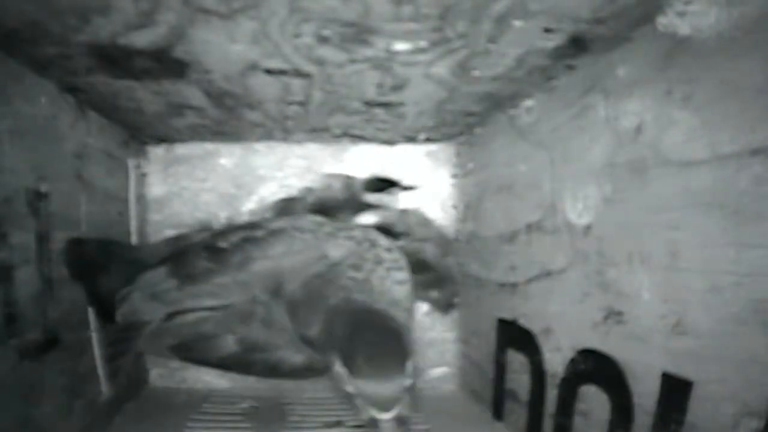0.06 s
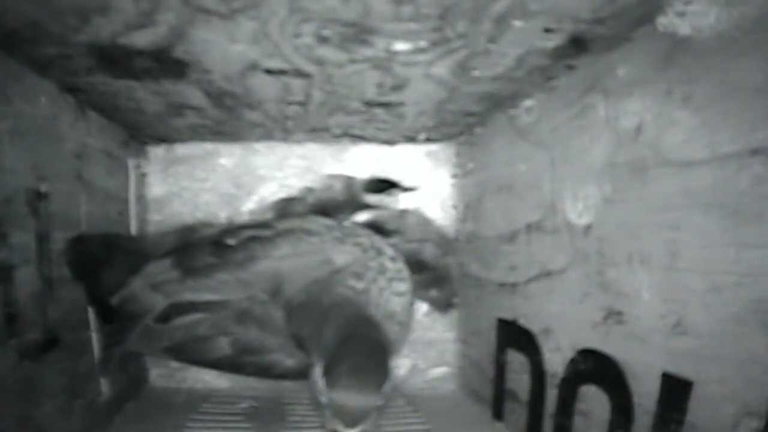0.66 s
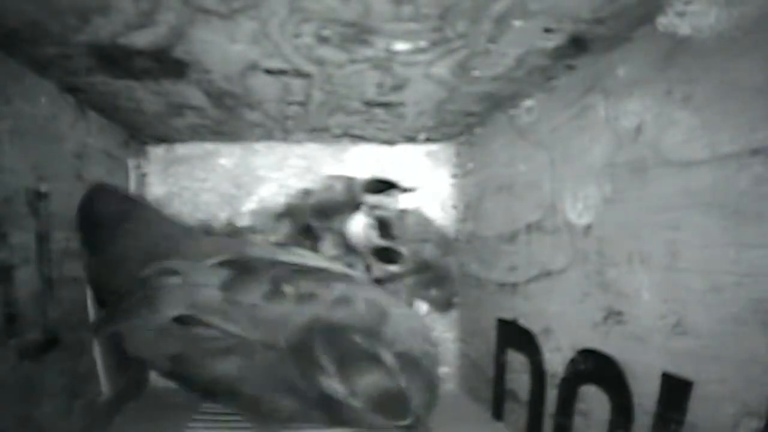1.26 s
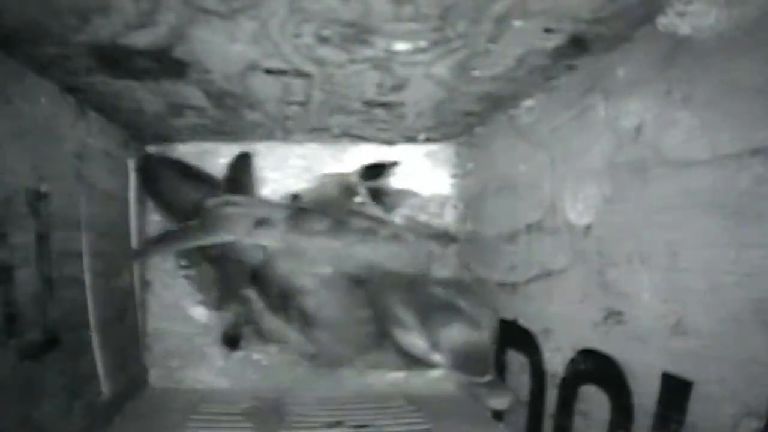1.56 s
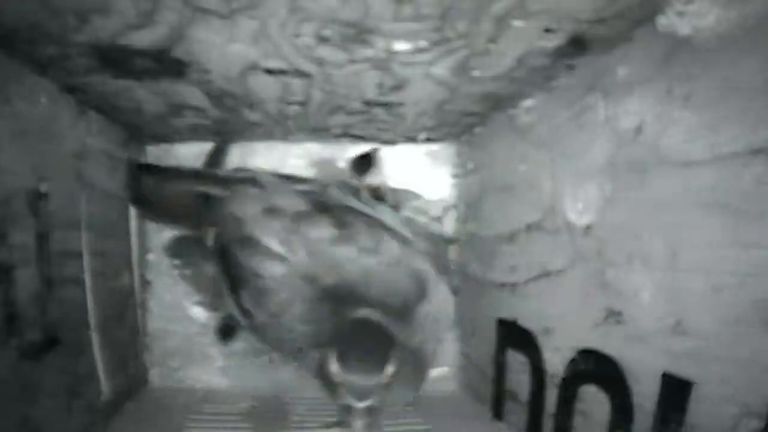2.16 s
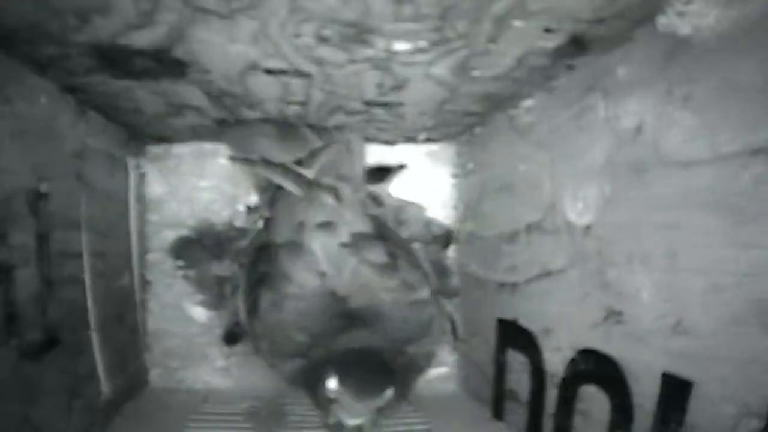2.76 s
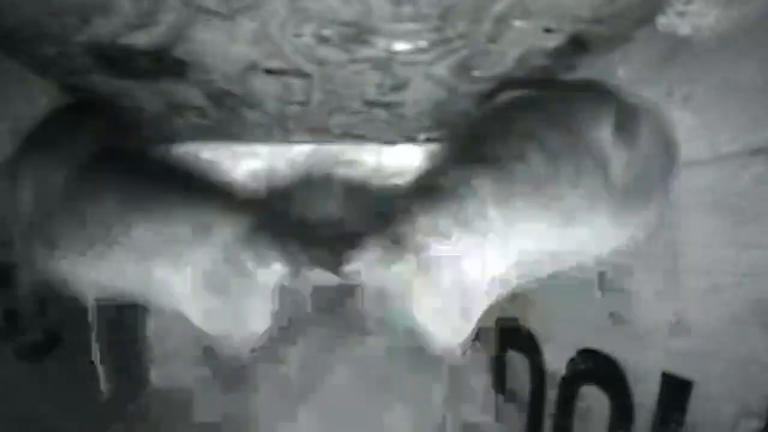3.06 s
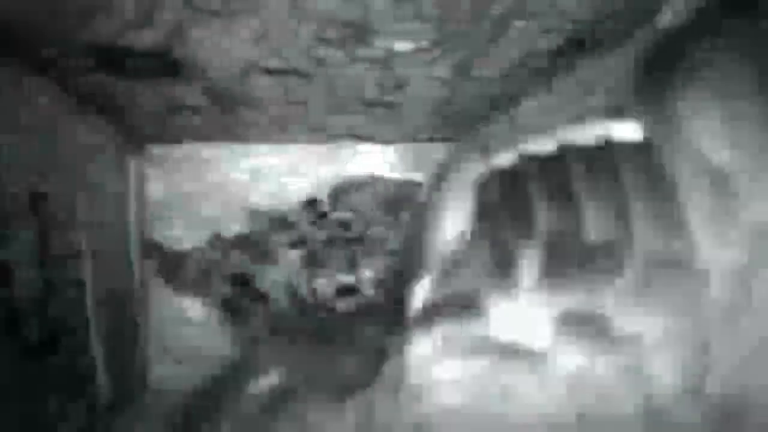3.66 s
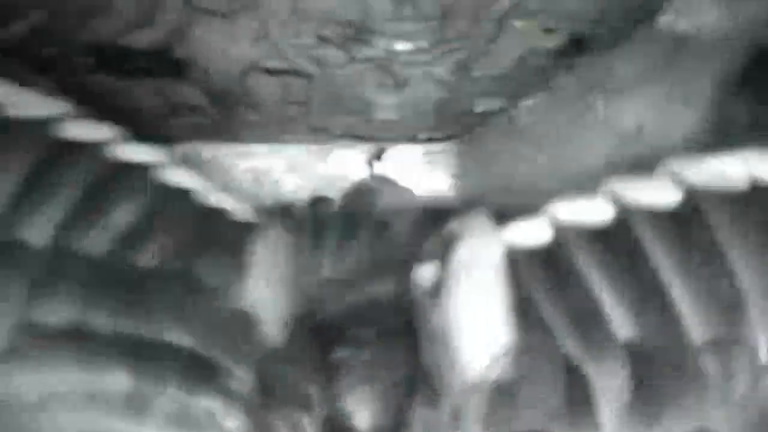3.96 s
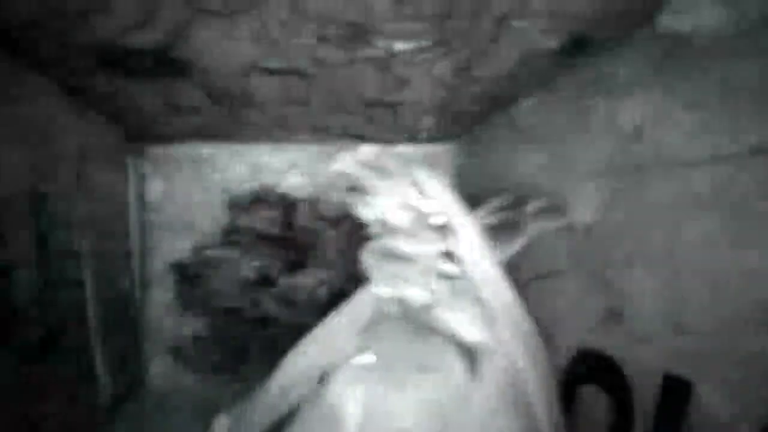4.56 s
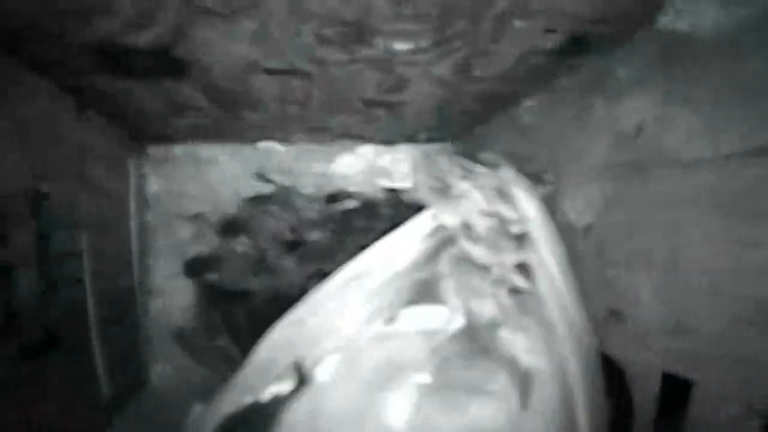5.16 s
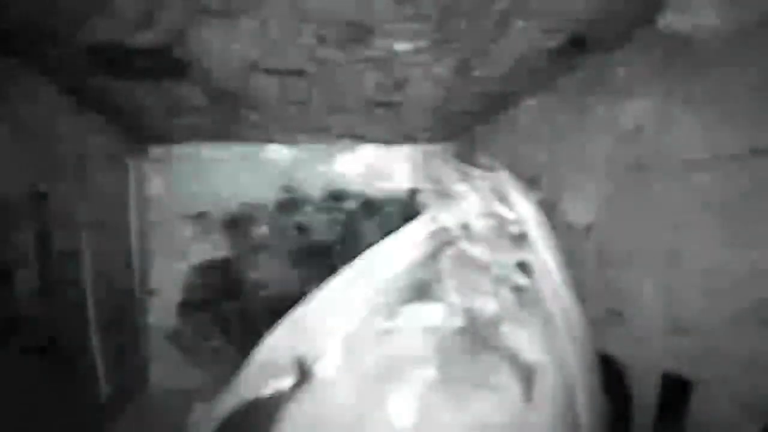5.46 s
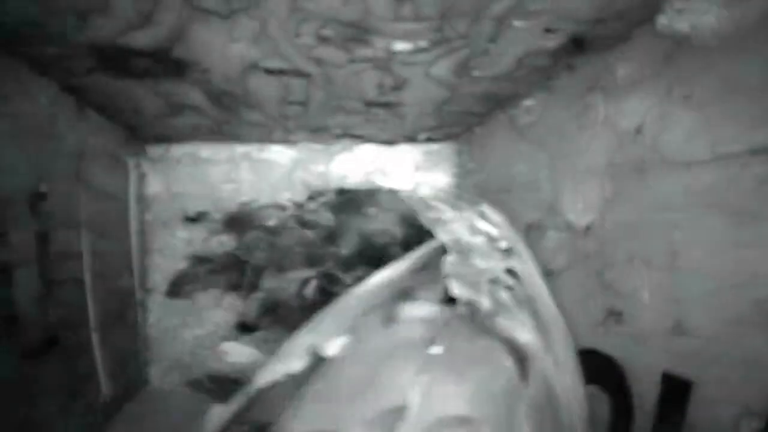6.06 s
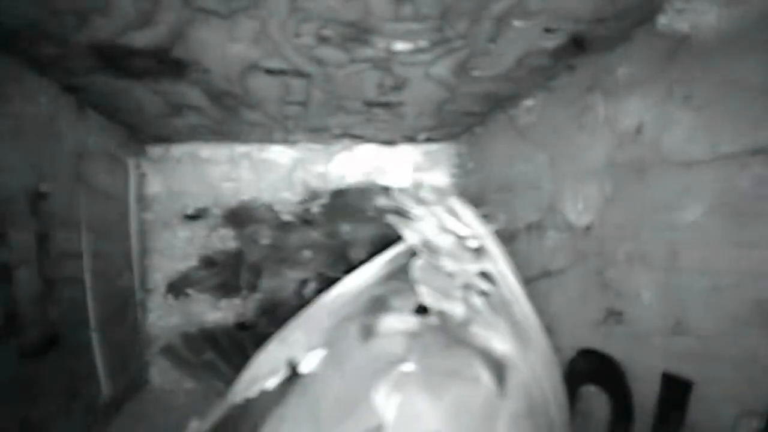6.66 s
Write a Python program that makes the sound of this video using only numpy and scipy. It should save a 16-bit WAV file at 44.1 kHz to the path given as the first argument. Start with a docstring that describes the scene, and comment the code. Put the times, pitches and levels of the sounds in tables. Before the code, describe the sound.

A steady low electrical buzz and faint hiss run throughout, heard from a close microphone inside a wooden nest box, on the left side only. A duckling gives two very faint falling peeps just before 1 second. From about 1 to 1.5 seconds a duck shifts, making three hollow knocks on the boards and a brush of feathers. Light claw taps, small scrapes and rustles follow until 3 seconds. Then the duck scrambles up the wall: feet and wings thump the wood, claws scratch, feathers rustle hard and wingbeats buffet the microphone with low puffs. The heaviest blows, near 3.3, 3.8 and 4.3 seconds, overload slightly. The flurry eases after 4.5 seconds, with one more sharp tap and scrape at 5 seconds. The duck settles with soft rustling, a couple of light knocks near 5.7 seconds and scattered ticks until almost 7 seconds.

```python
"""A duck shifts about in a wooden nest box, then scrambles up the wall with beating wings and settles.
Feet and wings thump the boards, claws scrape and tap the wood, feathers rustle in bursts and
wingbeats puff air at the microphone. A duckling peeps faintly twice before the scramble.
A small camera microphone inside the box buzzes at the field rate, overloads on the big blows
and feeds the left channel only."""
import sys
import numpy as np
from scipy import signal
from scipy.fft import rfft, irfft
from scipy.io import wavfile

SR = 44100
rng = np.random.default_rng(int(sys.argv[2]) if len(sys.argv) > 2 else 0)


def to_wav(sig):
    """Store sig (one row per channel, or 1-D mono) as 16-bit WAV at the path in sys.argv[1].

    Samples outside -1..1 are clipped; the rate is SR.
    """
    pcm = np.clip(np.atleast_2d(sig), -1, 1) * 32767
    pcm = np.round(pcm).astype(np.int16)
    wavfile.write(sys.argv[1], SR, pcm.T)  # frames by channels


N = 299659
TIME = np.arange(N) / SR

# resonances of the box and the microphone housing: centre_hz, width_hz, lift_db
BOX_RESONANCES = [(92.7, 3.4, 6), (111.6, 25, 10), (204.6, 7.2, 8), (300, 56, 8), (355.8, 31, 8.5),
                  (436.8, 19, 6.5), (620, 66, 10.5), (694, 61, 3.5), (897, 40, 3.5), (1207, 61, 5),
                  (1432, 67, 1), (1630, 130, 1), (1890, 44, 4), (2068, 24, -30), (2565, 164, 5),
                  (2810, 100, 6.5), (3280, 32, 3.5), (3530, 70, -2), (4374, 78, 5.5), (4604, 290, 11),
                  (6650, 420, 11), (8370, 370, 10), (10100, 690, 10)]
# EQ curves for the midrange rub, bright edge and low board shake of a contact: freq_hz, gain_db
RUB_EQ = [(100, 1), (350, -4), (750, 3), (1100, 8.5), (2000, 7), (2700, -4), (3500, -4), (6000, -53.5),
          (15000, -70)]
HISS_EQ = [(800, -41), (2400, 4), (3500, 4), (5000, -3), (7000, -9.5), (9500, -17), (12000, -16.5),
           (13000, -99), (16000, -82)]
SHAKE_EQ = [(50, -20), (150, -15.5), (300, 0.5), (450, -4), (700, -4), (1300, -33), (4000, -78.5)]
# how hard the duck struggles: time_s, level_db
EFFORT = [(1.2, -90), (1.34, -45), (1.5, -48.5), (1.74, -61), (2.63, -52.5), (2.79, -62), (3.07, -58),
          (3.21, -37.5), (3.3, -27), (3.99, -40.5), (4.21, -33.5), (4.34, -35.5), (4.67, -45), (5.11, -48),
          (5.54, -55), (6.28, -48.5), (6.46, -55), (6.79, -58.5)]


def from_db(db):
    """Decibels to gain."""
    return 10 ** (np.asarray(db) / 20)


def rms_one(x):
    """Scale to an rms of 1."""
    return x / np.sqrt(np.mean(x ** 2) + 1e-20)


def drift(rate_hz):
    """A random wander with an rms of 1."""
    knots = rng.standard_normal(4096)
    return rms_one(np.interp(TIME * rate_hz, np.arange(len(knots)), knots))


def colour(x, curve, peaks=(), size=8192):
    """Minimum-phase EQ of unit power gain: a smooth curve with resonances on it."""
    hz = np.maximum(np.arange(size // 2 + 1) * SR / size, 1)
    curve_hz, curve_db = np.transpose(curve)
    db = np.interp(np.log(hz), np.log(curve_hz), curve_db)
    for centre_hz, width_hz, lift_db in peaks:
        db += lift_db / (1 + (2 * (hz - centre_hz) / width_hz) ** 2)
    cepstrum = irfft(np.log(from_db(db)))
    cepstrum[1:size // 2] *= 2   # folded so that nothing rings ahead of a hit
    cepstrum[size // 2 + 1:] = 0
    response = irfft(np.exp(rfft(cepstrum)))
    return signal.fftconvolve(x, response / np.linalg.norm(response))[:N]


def stroke(start_s, hold_s, rise_s, t60_s, max_s=0.25):
    """Envelope of one gesture: it rises, holds until hold_s after its start and dies away."""
    out, first = np.zeros(N), int(start_s * SR)
    age = TIME[:min(N - first, int(max_s * SR))]
    decay = from_db(-60 * np.maximum(age - hold_s, 0) / t60_s)
    out[first:first + len(age)] = np.minimum(age / rise_s, 1) * decay
    return out


def ring(start_s, hz, t60_s):
    """One struck mode of the wood: a decaying sine."""
    out, first = np.zeros(N), int(start_s * SR)
    age = TIME[:min(N - first, SR // 2)]
    swell = 1 - np.exp(-age * hz * np.pi)   # the board takes part of a cycle to get going
    out[first:first + len(age)] = swell * np.sin(2 * np.pi * hz * age) * from_db(-60 * age / t60_s)
    return out


def friction(slips_per_s, spread_db, smooth_db, judder_db, judder_hz):
    """Tiny slips of uneven size over a smooth slide, bunched as the contact catches and lets go."""
    sizes = from_db(spread_db * np.minimum(rng.exponential(1, N), 4)) * rng.choice([-1, 1], N)
    slips = rms_one(sizes * (rng.random(N) < slips_per_s / SR))
    slide = from_db(smooth_db) * rng.standard_normal(N)
    return rms_one((slips + slide) * from_db(judder_db * drift(judder_hz)))


def wall_echoes(x, spread_s, echo_db, count=10):
    """Each spot in the box has its own close reflections, which comb the sound differently."""
    path = np.zeros(SR // 40)
    where, strengths = rng.random(count), rng.standard_normal(count)
    delays = np.clip((where * spread_s * SR).astype(int), 8, len(path) - 1)
    path[delays] = from_db(echo_db) * strengths / np.linalg.norm(strengths)
    path[0] = 1
    return signal.fftconvolve(x, path)[:len(x)]


def effort(easy_shuffle_db=-50.5):
    """The duck's effort at every moment, in dB over an easy shuffle; before it stirs it sits still."""
    return np.interp(TIME, *np.transpose(EFFORT), left=-120) - easy_shuffle_db


def dulling(level_db, medium_contact_db=-29.5):
    """Treble loss in dB: a claw that digs in harder sounds duller."""
    return 0.1045 * (level_db - medium_contact_db)


def noise_floor():
    """A steady, bass-heavy bed of noise."""
    # tone of the bed: freq_hz, gain_db
    floor_eq = [(20, 8), (60, 4), (130, 3), (300, -3.5), (600, -11.5), (1000, -13.5), (2000, -16.5),
                (3200, -24), (7000, -26.5), (15000, -31)]
    return from_db(-48) * colour(rng.standard_normal(N), floor_eq)


def camera_buzz(field_hz=59.94, first_field_s=0.0016, pulse_s=0.00043, fizz_s=0.001):
    """Each picture field leaks a dull pulse and a puff of hiss; the line scan adds a blurred whine."""
    phase = (TIME - first_field_s) * field_hz
    gap_s = np.abs((phase + 0.5) % 1 - 0.5) / field_hz   # to the nearest pulse
    pulses = -np.exp(-gap_s / pulse_s)
    pulses -= pulses.mean()
    ripple = -np.cos(4 * np.pi * phase)
    hiss = colour(rng.standard_normal(N), [(200, 0), (2000, -3), (5000, -10), (15000, -16)])
    fizz = np.exp(-gap_s / fizz_s) * hiss
    whine_band = signal.butter(2, [15320, 15480], "band", fs=SR, output="sos")
    whine = rms_one(signal.sosfilt(whine_band, rng.standard_normal(N)))
    return from_db(-35) * pulses + from_db(-56) * ripple + from_db(-55) * fizz + from_db(-65) * whine


def knocks():
    """Each blow cracks, sets the struck board ringing and leaves the box humming low."""
    # feet and wing bones hit the boards: start_s, level_db, pitch_hz, crack_offset_db
    blows = [(.049, -39.5, 300, -12), (1.075, -15, 324, -6.5), (1.32, -10.5, 335, -3),
             (1.5318, -1.5, 453, -8), (2.054, -26, 334, -12), (2.466, -29, 347, -7), (3.158, -5.5, 300, -5),
             (3.193, -8.5, 300, -28), (3.328, 14.5, 304.2, -10.5), (3.49, 3.5, 208, -3.5),
             (3.774, 13, 303.6, -15), (3.807, 0, 257.5, -15.5), (3.941, -10.5, 337, -0.5),
             (4.238, 5, 220, -19.5), (4.243, 1, 104, -21), (4.25, 1, 400.5, -17), (4.258, 5, 247.4, -16.5),
             (4.28, 3, 308.3, -3), (4.387, -17, 263, 1), (4.485, -10.5, 335, -9.5),
             (4.57, -12.5, 344.5, -8.5), (5.058, -20, 333, -27), (5.703, -22, 451, -10.5),
             (5.731, -19, 455, -3.5)]
    # how long the boards ring: pitch_hz, t60_s
    board_decay = [(210, 0.057), (305, 0.12), (340, 0.14), (455, 0.084)]
    # a board's other modes: pitch_ratio, level_db, t60_ratio
    board_modes = [(.68, -9.5, 0.86), (1.499, -12, 0.59), (2.22, -16.5, 0.54)]
    # the whole box after a blow: pitch_hz, level_db, t60_s
    box_modes = [(117, -23.5, 0.27), (202.4, -30, 0.73), (315, -17.5, 0.22)]
    # tone of the attack: freq_hz, gain_db
    crack_eq = [(100, -19.5), (400, -0.5), (900, -10.5), (1600, -7), (2200, -16), (3000, -29), (5000, -38),
                (9000, -58), (15000, -56)]
    body, crack = np.zeros((2, N))
    for start_s, level_db, pitch_hz, crack_offset_db in blows:
        t60_s = np.interp(pitch_hz, *np.transpose(board_decay))
        board = ring(start_s, pitch_hz, t60_s)
        for pitch_ratio, mode_db, t60_ratio in board_modes:
            board += from_db(mode_db) * ring(start_s, pitch_hz * pitch_ratio, t60_s * t60_ratio)
        box = sum(from_db(db) * ring(start_s, hz, decay_s) for hz, db, decay_s in box_modes)
        body += from_db(level_db) * (board + box)
        snap = stroke(start_s, hold_s=0.0025, rise_s=0.00045, t60_s=0.04)
        crack += from_db(level_db + crack_offset_db) * snap
    return body + colour(crack * rng.standard_normal(N), crack_eq, BOX_RESONANCES)


def duckling():
    """Soft sine peeps that slide down."""
    # a duckling's faint calls: start_s, length_s, level_db, start_hz, end_hz
    peeps = [(0.71, .042, -59, 2630, 2360), (.862, .048, -61, 2700, 2360)]
    out = np.zeros(N)
    for start_s, length_s, level_db, start_hz, end_hz in peeps:
        progress = np.clip((TIME - start_s) / length_s, 0, 1)
        pitch_hz = start_hz + (end_hz - start_hz) * progress
        tone = np.sin(2 * np.pi * np.cumsum(pitch_hz) / SR)
        out += from_db(level_db) * np.sin(np.pi * progress) * tone
    return out


def feathers():
    """Plumage brushes the walls: barbs hiss and bedding crackles while the body pushes on the boards."""
    # a wing or the tail sweeps along a wall: middle_s, length_s, level_db
    sweeps = [(1.395, 0.08, -33.5), (1.568, 0.029, -28.5), (2.121, 0.11, -45), (2.33, 0.1, -42),
              (2.624, 0.15, -30.5), (3.068, 0.15, -36.5), (3.178, 0.12, -25.5), (3.473, 0.12, -20),
              (3.704, 0.44, -28), (3.968, 0.16, -27.5), (4.152, .17, -26.5), (4.537, 0.087, -33),
              (5.5, 0.059, -42.5), (6.26, 0.12, -41.5)]
    # how heavily the body leans on the boards: time_s, level_db
    weight = [(1.3, -56), (1.68, -41), (1.91, -49.5), (3.09, -52.5), (3.29, -41), (3.33, -26.5),
              (3.84, -33.5), (3.93, -37), (4.21, -39), (4.4, -25.5), (4.69, -42), (5.21, -43.5),
              (5.43, -47.5), (5.93, -53), (6.13, -46), (6.79, -57)]
    # tone of the boards' rumble: freq_hz, gain_db
    push_eq = [(20, -25), (50, 0), (90, -0.5), (160, -3), (300, -1.5), (480, -6), (750, -24), (1300, -22),
               (4000, -99)]
    sweep = np.zeros(N)
    for middle_s, length_s, level_db in sweeps:
        sweep += from_db(level_db) * np.maximum(1 - (2 * (TIME - middle_s) / length_s) ** 2, 0)
    effort_db = effort()
    push = from_db(6.5 + np.interp(TIME, *np.transpose(weight), left=-120))
    rub = np.hypot(from_db(-45 + 0.91 * effort_db), from_db(-2) * sweep)
    hiss = np.hypot(from_db(-55 + 0.89 * effort_db), from_db(-5) * sweep)
    barbs = friction(slips_per_s=1000, spread_db=-1, smooth_db=0.5, judder_db=3, judder_hz=60)
    bedding = friction(slips_per_s=110, spread_db=2.5, smooth_db=-30, judder_db=1.5, judder_hz=15)
    rumble = friction(slips_per_s=3000, spread_db=-2.5, smooth_db=3, judder_db=3.4, judder_hz=40)
    rustle = rms_one(barbs + 0.6 * bedding)
    return (colour(push * rumble, push_eq, BOX_RESONANCES)
            + colour(rub * rustle, RUB_EQ, BOX_RESONANCES)
            + colour(hiss * rustle, HISS_EQ, BOX_RESONANCES))


def wing_air(rise_s=0.029):
    """Wingbeats and lunges buffet the microphone with low puffs."""
    # pushes of air: peak_s, level_db
    wingbeats = [(1.335, -35), (1.68, -47), (3.155, -20.5), (3.37, -14), (3.521, -16.5), (3.72, -42),
                 (3.82, -17.5), (3.928, -17.5), (4.246, -10), (4.37, -20), (4.58, -25), (4.71, -30.5),
                 (5.01, -29), (6.22, -35.5)]
    # tone of a puff: freq_hz, gain_db
    air_eq = [(20, 2), (50, -11), (100, -5), (170, -8), (300, -1.5), (1000, -52.5)]
    puffs = sum(from_db(level_db) * stroke(peak_s - rise_s, rise_s, rise_s, t60_s=0.34, max_s=1)
                for peak_s, level_db in wingbeats)
    return colour(puffs * rng.standard_normal(N), air_eq, BOX_RESONANCES)


def rasp(x, pitch_hz, width_hz=180, lift_db=6):
    """The claw's own chatter favours one band, at unchanged power."""
    b, a = signal.iirpeak(pitch_hz, pitch_hz / width_hz, fs=SR)
    chatter = x + from_db(lift_db) * signal.lfilter(b, a, x)
    return chatter * np.linalg.norm(x) / np.linalg.norm(chatter)


def claw_scrapes(size=8192):
    """A claw catches, then sticks and slips across the grain; part of the force shakes the boards."""
    # claws dragged over wood: start_s, length_s, level_db, pitch_hz
    scratches = [(1.55, 0.029, -38, 1940), (1.588, 0.052, -34.5, 1550), (2.156, 0.025, -39.5, 1720),
                 (2.595, 0.033, -31.5, 1750), (3.038, 0.049, -31, 1950), (3.256, 0.017, -8, 2300),
                 (3.289, 0.024, -11, 2310), (3.365, .026, -10, 2470), (3.401, 0.014, -11, 1350),
                 (3.442, 0.057, -13.5, 1980), (3.585, 0.0077, -22.5, 1273), (3.957, .054, -29.5, 1748),
                 (4.321, 0.022, -16, 1350), (4.417, 0.016, -23.5, 1180), (4.947, 0.023, -26, 1560),
                 (5.009, 0.032, -16.5, 2810), (5.051, 0.01, -15, 1260), (6.204, .015, -38.5, 1890)]
    slips = friction(slips_per_s=2200, spread_db=3, smooth_db=0.5, judder_db=2.5, judder_hz=250)
    chatter, edge, shake = np.zeros((3, N + size))
    for start_s, length_s, level_db, pitch_hz in scratches:
        first = int(start_s * SR)
        drag = stroke(start_s, length_s, rise_s=0.0029, t60_s=0.037)[first:first + size]
        span = slice(first, first + len(drag))
        scrape = drag * slips[span]
        scrape[0] = from_db(2)   # the click as the claw catches
        scrape = wall_echoes(scrape, spread_s=0.0046, echo_db=-5)
        scrape *= from_db(level_db) * np.linalg.norm(drag) / np.linalg.norm(scrape)
        chatter[span] += rasp(scrape, pitch_hz)
        edge[span] += from_db(-dulling(level_db)) * scrape
        shake[span] += scrape
    return (from_db(-2) * colour(chatter, RUB_EQ, BOX_RESONANCES)
            + from_db(-13) * colour(edge, HISS_EQ, BOX_RESONANCES)
            + from_db(-4) * colour(shake, SHAKE_EQ, BOX_RESONANCES))


def light_touches(taps_per_s=8, easy_db=-41.5, spread_db=2, count=200):
    """Once the duck stirs, light taps come at random, louder with effort: start_s, level_db."""
    gap_draws, level_draws = rng.random((count, 2)).T
    starts_s = EFFORT[0][0] - np.cumsum(np.log(gap_draws)) / taps_per_s
    levels_db = easy_db + np.interp(starts_s, TIME, effort()) + spread_db * (2 * level_draws - 1)
    return [(start_s, db) for start_s, db in zip(starts_s, levels_db) if start_s < N / SR]


def ticks(hits, skid_s=0.004, t60_s=0.016, size=4096):
    """A hard tip strikes, skids briefly and stops; yields each hit's span, level and sound."""
    age = TIME[:size]
    strike = from_db(11) * (age == 0)
    skid = from_db(-60 * np.maximum(age - skid_s, 0) / t60_s)
    for start_s, level_db in hits:
        tick = wall_echoes(strike + skid * rng.standard_normal(size), spread_s=0.006, echo_db=-0.5)
        tick *= from_db(level_db) * np.linalg.norm(skid) / np.linalg.norm(tick)
        first = int(start_s * SR)
        yield slice(first, first + size), level_db, tick


def taps_and_flicks():
    """Claw tips sound through the wood and shake it; flicking quills give only the bright edge."""
    # claw tips catch on the wall: start_s, level_db
    claw_taps = [(1.887, -41.5), (2.323, -37), (2.611, -40), (2.639, -29.5), (2.663, -29.5), (2.699, -28),
                 (2.841, -39), (3.074, -25.5), (3.113, -12), (3.154, -4.5), (3.166, -2), (3.252, -10),
                 (3.494, -15), (3.708, -18.5), (3.811, -15), (3.941, -13), (4.176, -17.5), (4.284, -17),
                 (4.305, -2.5), (4.379, -16), (4.414, -25.5), (4.534, -20.5), (4.708, -31), (4.867, -33.5),
                 (4.99, -9.5), (5.316, -35), (5.757, -35), (5.819, -33), (6.757, -32)]
    # stiff quills flick past each other: start_s, level_db
    quill_flicks = [(2.663, -33), (3.113, -27.5), (3.735, -47), (3.857, -37.5), (4.244, -29),
                    (4.271, -31.5), (4.762, -41.5), (4.99, -25.5), (5.22, -47), (5.409, -45.5),
                    (5.505, -43.5), (5.607, -47), (6.139, -43), (6.757, -52)]
    force, edge = np.zeros((2, N + SR))
    for span, _, tick in ticks(quill_flicks):
        edge[span] += tick
    for span, level_db, tick in ticks(list(claw_taps) + light_touches()):
        force[span] += tick
        edge[span] += from_db(-17 - dulling(level_db)) * tick
    return (from_db(1) * colour(force, RUB_EQ, BOX_RESONANCES)
            + from_db(5.5) * colour(edge, HISS_EQ, BOX_RESONANCES)
            + from_db(-1) * colour(force, SHAKE_EQ, BOX_RESONANCES))


def scene():
    """Everything reaches one microphone, wired to the left channel."""
    microphone = (noise_floor() + camera_buzz() + knocks() + claw_scrapes() + feathers()
                  + wing_air() + duckling() + taps_and_flicks())
    return np.array([microphone, np.zeros(N)])


def record(dry, ceiling=0.91, crosstalk_db=-45, hiss_db=-68, cutoff_hz=15800):
    """The preamplifier flattens loud peaks; the right channel holds only faint crosstalk and hiss."""
    left = dry[0] / (1 + (dry[0] / ceiling) ** 4) ** (1 / 4)
    stereo = np.array([left, from_db(crosstalk_db) * left])
    hiss = from_db(hiss_db) * rng.standard_normal((2, N))
    lowpass = signal.ellip(10, 0.2, 80, cutoff_hz, fs=SR, output="sos")
    return signal.sosfilt(lowpass, stereo + hiss)


dry = scene()
out = record(dry)
to_wav(out)
```